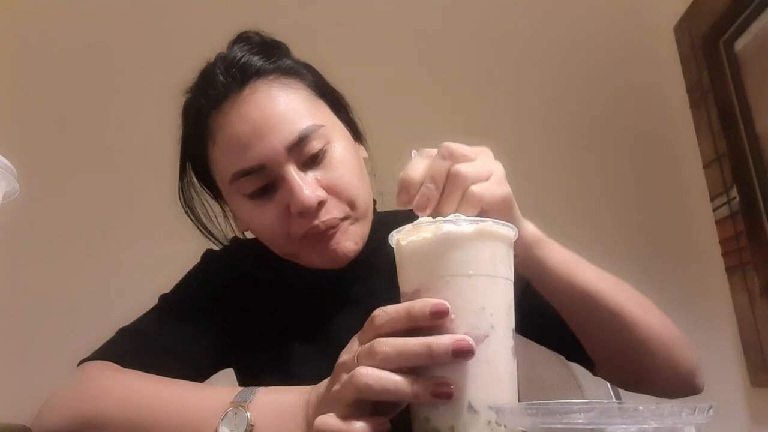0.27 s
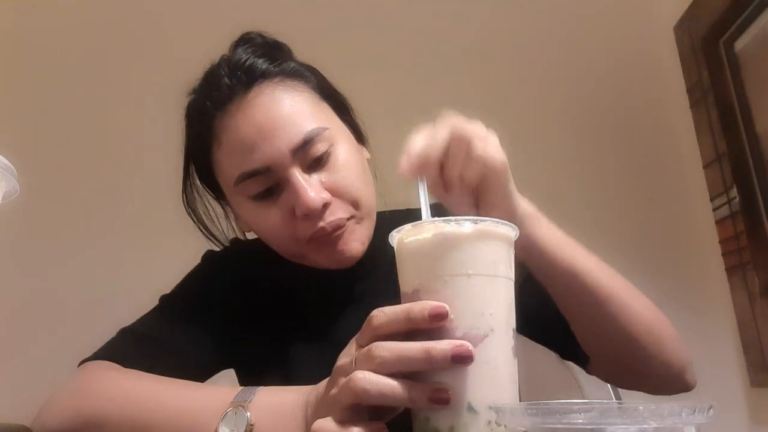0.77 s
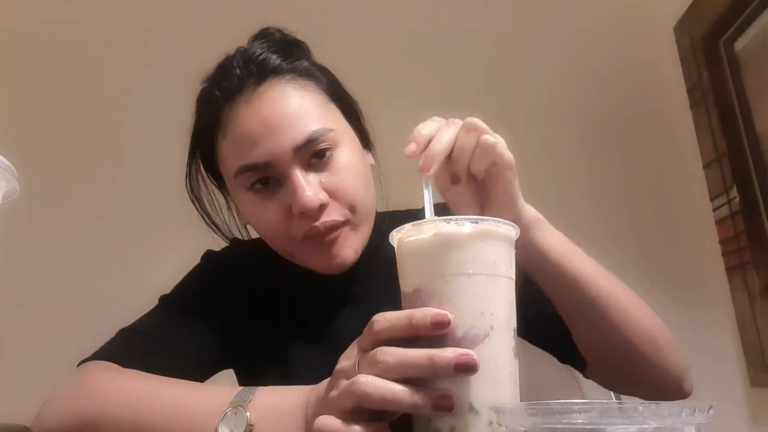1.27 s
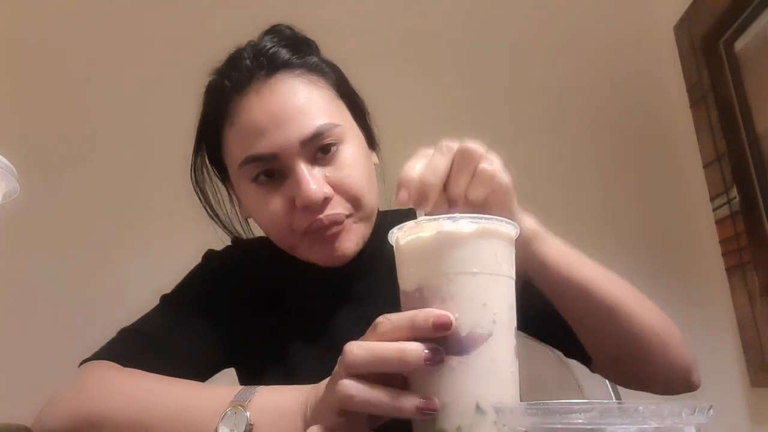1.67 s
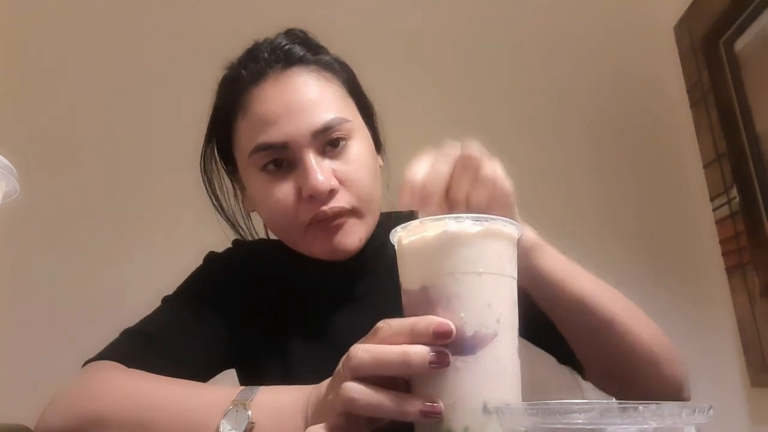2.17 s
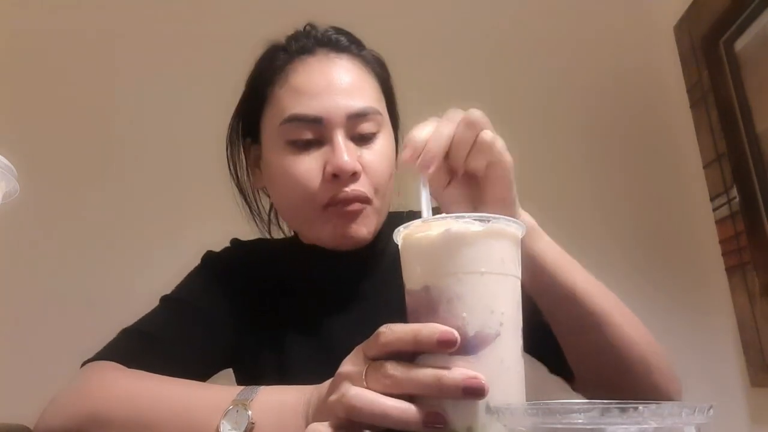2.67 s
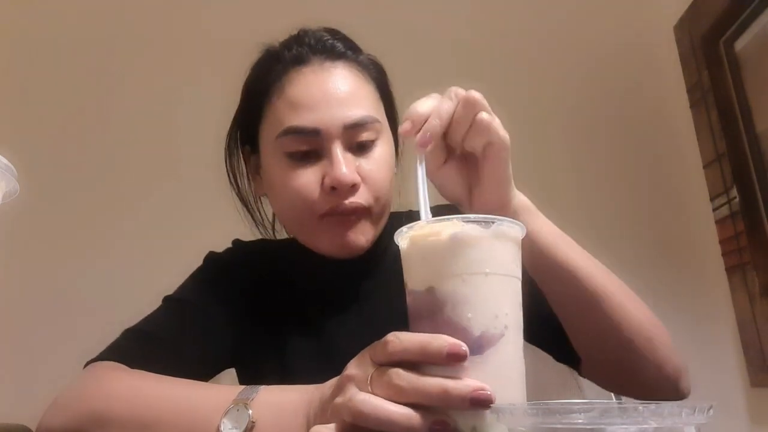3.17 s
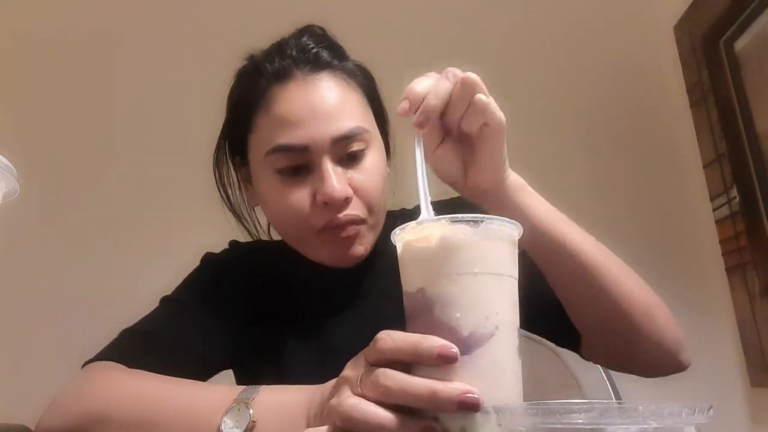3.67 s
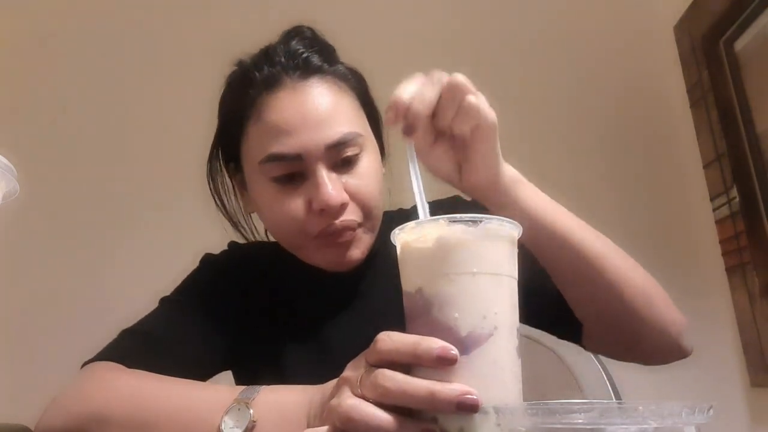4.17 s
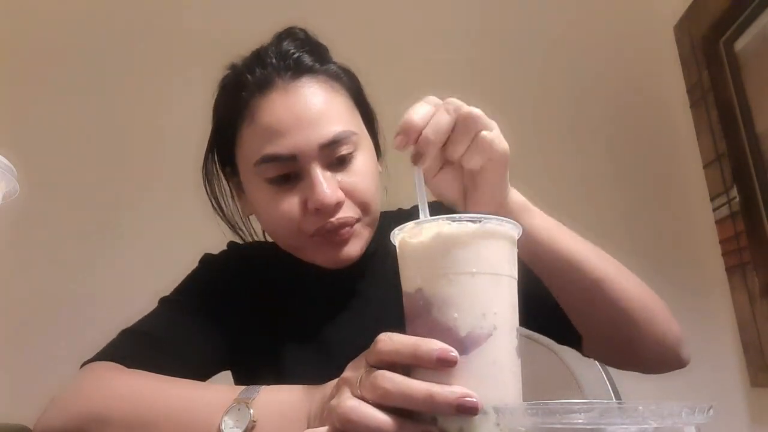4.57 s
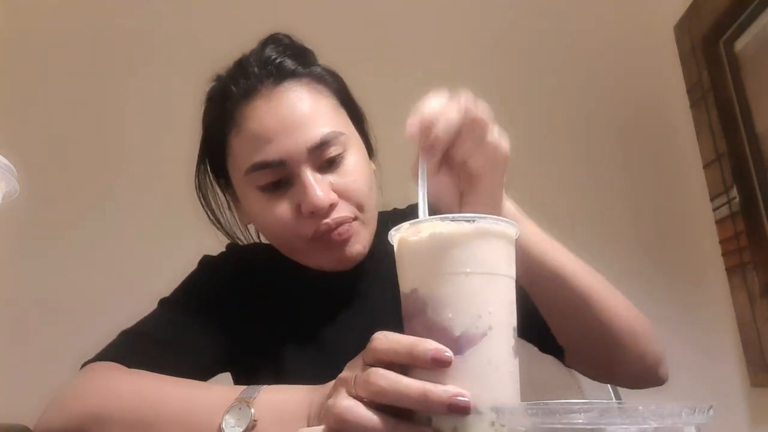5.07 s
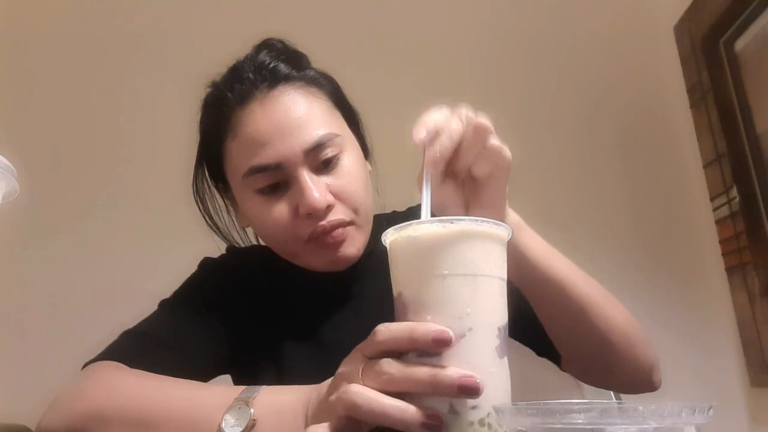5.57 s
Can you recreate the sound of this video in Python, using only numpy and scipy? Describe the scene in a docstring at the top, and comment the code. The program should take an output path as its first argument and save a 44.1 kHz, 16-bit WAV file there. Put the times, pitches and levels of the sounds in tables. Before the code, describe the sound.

A plastic spoon jabs and stirs crushed ice in a plastic cup, close to the microphone. Quick, uneven strokes bring wet crunches, sharp little clicks and dull thumps through a wooden table. The thumps are strongest around the middle, with a few low gulps, then the stirring turns lighter, with small squeaks. A faint low hum sits behind it in a quiet room.

```python
"""Spoon in crushed ice

A plastic cup of crushed ice on a wooden table in a quiet room, a phone's two microphones close by.
A plastic spoon jabs up and down: each jab thumps the table through the cup, the slush crunches and
squeaks, lumps click on spoon and wall, and deep plunges gulp. A faint tone wavers near 300 Hz."""
import sys
import numpy as np
from scipy import signal
from scipy.fft import rfft, irfft, next_fast_len
from scipy.io import wavfile
from scipy.ndimage import map_coordinates

SR = 44100
rng = np.random.default_rng(int(sys.argv[2]) if len(sys.argv) > 2 else 0)


def unload_wav(signal):
    """Save mono or channel-first audio to the path in sys.argv[1] as 16-bit WAV at rate SR, clipped to [-1, 1]."""
    wavfile.write(
        sys.argv[1],
        SR,
        np.round(np.clip(np.atleast_2d(signal).T, -1, 1) * 32767).astype(np.int16),
    )


N = 256662


def amp(db):
    """Gain of a level in dB."""
    return 10 ** (np.asarray(db) / 20)


def unit(x):
    """Scaled to rms 1."""
    return x / np.sqrt(np.mean(x ** 2) + 1e-20)


def along(points, hz):
    """Reads (frequency, value) points on a log frequency axis."""
    f, v = np.transpose(points)
    return np.interp(np.log(hz + 1), np.log(f + 1), v)


def wobble(rate):
    """A smooth random curve, rate knots a second."""
    return map_coordinates(rng.standard_normal(int(N * rate / SR) + 4), [np.arange(N) * rate / SR])


def filtered(x, response):
    """x through a complex frequency response."""
    m = next_fast_len(N + SR // 2)
    return irfft(rfft(x, m) * response(np.fft.rfftfreq(m, 1 / SR)), m)[..., :N]


def resonance(f, hz, width):
    """Response of one causal resonance."""
    return 1j * f * width / (hz * hz - f * f + 1j * f * width + 1e-9)


# Balance at the microphones: (frequency [Hz], left over right [dB])
MIC_BALANCE = [(60, -4), (400, 2), (700, 4), (1300, 8), (2400, 15), (4400, 14), (6000, 6.5), (8000, -3.5),
               (15000, 2)]
def mic_gains(hz):
    """Left and right gain: the low treble is much louder on the left."""
    return amp(along(MIC_BALANCE, hz) / 2 * np.array([[1], [-1]]))


# Likeness of the two microphones' signals: (frequency [Hz], coherence [0-1])
MIC_COHERENCE = [(60, 0.5), (300, 0.87), (640, 0.71), (1400, 0.069), (3100, 0.3), (8000, 0)]
def mic_pair(noise, colour):
    """Colours two noises and mixes them as the two microphones hear them, rms 1."""
    m = next_fast_len(N + SR // 2)
    f = np.fft.rfftfreq(m, 1 / SR)
    angle = np.arccos(np.clip(along(MIC_COHERENCE, f), 0, 1)) / 2
    mid, side = rfft(noise, m) * colour(f) * [np.cos(angle), np.sin(angle)]
    return unit(irfft(mic_gains(f) * [mid + side, mid - side], m)[:, :N])


# The quiet room at the microphones: (frequency [Hz], relative density [dB])
AIR_SPECTRUM = [(18, -9), (30, 9.5), (184, 13.5), (245, 12.5), (295, 19.5), (540, 3), (1070, -17),
                (1540, -13.5), (1760, -18), (3770, -20), (9460, -17.5), (14800, -19), (16000, -25)]
def room_air():
    """Room tone and a weak mains hum."""
    hum = amp(-62.5) * np.sin(2 * np.pi * 50 * np.arange(N) / SR)
    level = amp(-58 + 1.9 * wobble(3.42))
    return hum + level * mic_pair(rng.standard_normal((2, N)), lambda f: amp(along(AIR_SPECTRUM, f)))


# Course of the faint tone: (time [s], pitch [Hz], level [dB])
TONE_PATH = [(0, 210, -45), (.05, 215, -45.5), (.075, 299.3, -48), (.3, 303.3, -61.5), (.8, 296.5, -64),
             (3.4, 297.8, -59.5), (4.7, 296.3, -56), (5.02, 298, -54.5), (5.38, 300.5, -61),
             (5.47, 262.4, -47.5), (5.51, 260.4, -43), (5.57, 309.8, -35.5), (5.65, 297.7, -41),
             (5.72, 290, -56), (5.82, 296, -58.5)]
def faint_tone():
    """A background tone that wavers in pitch and flutters in level."""
    times, *columns = np.transpose(TONE_PATH)
    hz, db = (np.interp(np.arange(N) / SR, times, column) for column in columns)
    phase = 2 * np.pi * np.cumsum(hz) / SR + 0.85 * wobble(45)
    flutter_db = 2.5 * wobble(30)
    return amp(db + flutter_db) * np.sin(phase + np.array([[0], [.8]]))


def grit(rate, spread_db, smooth):
    """Two streams of hiss, roughened by rate tiny breaks a second of uneven size."""
    breaks = (rng.random(N) < rate / SR) * amp(spread_db * np.clip(rng.standard_normal(N), -2, 2))
    bursts = signal.fftconvolve(breaks, np.exp(-np.arange(300) / 40))[:N]
    return rng.standard_normal((2, N)) * (smooth + unit(bursts))


def splinters(count):
    """Wet splinters of ice: short damped rings, each at its own pitch and side, rms 1."""
    jitter, pitch, size, side = rng.standard_normal((count, 4)).T
    start = np.clip((np.arange(count) + jitter) * N / count, 0, N).astype(int)
    hz = np.clip(3500 * np.exp(.55 * pitch), 1200, SR / 6)[:, None]
    t = np.arange(160) / SR
    rings = amp(3.5 * np.clip(size, -2, 2))[:, None] * np.sin(2 * np.pi * hz * t) * np.exp(-hz * t / 3.5)
    at = (start[:, None] + np.arange(len(t))).ravel()
    lean_db = along(MIC_BALANCE, hz) / 2 + 3 * side[:, None]
    return unit(np.array([np.bincount(at, (amp(k * lean_db) * rings).ravel(), N)[:N] for k in (1, -1)]))


# Crunching slush from close by: (frequency [Hz], relative density [dB])
SLUSH_SPECTRUM = [(650, -24), (1100, -13), (1460, -2), (2240, -20.5), (2510, -7.5), (3510, -7), (4740, -13),
                  (7620, -12), (9000, -18.5), (11700, -82)]
def slush_colour(f):
    """The broad crunch, with the spoon's stem ringing along."""
    return amp(along(SLUSH_SPECTRUM, f)) + amp(-5) * resonance(f, hz=3975, width=50)


# Modes of the cup wall: (frequency [Hz], width [Hz], level [dB])
CUP_MODES = [(629, 246, 0.5), (908, 187, 0), (1151, 69, -6), (1464, 19, -12)]
def cup_wall(f):
    """The hollow cup's response: resonances of alternating sign."""
    return sum((-1) ** k * amp(db) * resonance(f, hz, width)
               for k, (hz, width, db) in enumerate(CUP_MODES))


# High fizz of the ice: (frequency [Hz], gain [dB])
FIZZ_SPECTRUM = [(2940, -31), (5000, 3.5), (7240, 6.5), (7420, 1.5), (10300, -6), (13900, -2), (16000, -11)]
def fizz_colour(f):
    """The bright top of crunches and cracks."""
    return amp(along(FIZZ_SPECTRUM, f))


# Strokes of the spoon: (time of hardest moment [s], rise [s], fall [s], slush level [dB],
# drag level [dB], rattle over slush [dB], fizz over slush [dB], air pocket [Hz])
SPOON_STROKES = [(0.047, 0.069, 0.14, -67, -79, -5, 1.5, 3420),
                 (0.198, 0.039, 0.094, -58.5, -73, -12, -2, 2800),
                 (0.247, 0.04, 0.073, -51.5, -68, -10, -9, 1460),
                 (.417, 0.062, 0.15, -59.5, -94, -3.5, -6, 1220),
                 (0.528, 0.018, 0.068, -47, -63.5, -32, -6.5, 2010),
                 (0.582, 0.06, 0.11, -45, -66.5, 1.5, -6, 1370),
                 (.73, 0.074, 0.098, -57.5, -100, -7.5, -6, 3836),
                 (0.885, 0.05, 0.13, -40, -58.5, 2.5, -1.5, 1230),
                 (1.152, 0.027, 0.29, -50, -59, 2, -2, 1130), (1.375, 0.008, 0.11, -58, -68, 2, -10, 3920),
                 (1.406, 0.026, 0.11, -42.5, -52.5, 2, -0.5, 3920),
                 (1.53, 0.1, 0.11, -64.5, -72, 6, -1, 3600), (1.632, 0.0057, 0.083, -55, -50, 2, -9, 3960),
                 (1.673, 0.038, 0.069, -41.5, -56.5, 5.5, -1, 4320),
                 (1.79, 0.2, 0.09, -61, -102, 1, -1.5, 3520),
                 (1.922, 0.063, 0.076, -43, -60.5, 7.5, 2, 3450),
                 (2.042, 0.14, 0.075, -61.5, -90, -4, -5, 3420),
                 (2.141, 0.041, 0.22, -48, -53, -0.5, -1.5, 2680),
                 (2.331, 0.0061, 0.34, -49.5, -52, -3, -3.5, 3230),
                 (2.601, 0.078, 0.024, -48.5, -55.5, -12, -6, 3000),
                 (2.699, 0.17, 0.051, -58, -69, -4, -2, 3170),
                 (2.805, 0.055, 0.2, -47.5, -59, -4, -1.5, 4150),
                 (3.04, 0.056, 0.063, -52.5, -60, 10, -5, 1300), (3.12, 0.053, 0.41, -71, -89, -7, 5, 1590),
                 (3.278, 0.049, 0.16, -53, -60.5, 1.5, -3, 1440),
                 (3.518, 0.031, 0.076, -54, -76, -22, -4, 2600),
                 (3.566, 0.068, 0.18, -58.5, -65, 2.5, -5.5, 1374),
                 (3.752, 0.0042, 0.11, -56.5, -69, -7, 3, 2850),
                 (3.826, 0.079, 0.077, -48, -60.5, -13, -5, 1670),
                 (3.9, 0.025, 0.2, -64, -83.5, 1.5, -12, 1670),
                 (4.08, 0.099, 0.048, -51.5, -69, -1, -6.5, 1250),
                 (4.21, 0.12, 0.084, -65.5, -78, -1.5, 4, 1430),
                 (4.323, 0.066, 0.11, -55, -68, 0, -1, 1370),
                 (4.451, 0.057, 0.063, -59.5, -81.5, -3, 1, 1490),
                 (4.558, 0.03, 0.25, -50.5, -68, -6, -3, 2070),
                 (4.832, 0.041, 0.092, -47.5, -56.5, -2, -5.5, 2300),
                 (4.96, 0.21, 0.35, -75, -75, -8, 2.5, 2530), (5.104, 0.053, 0.15, -55, -62, 6, -5.5, 2570),
                 (5.227, 0.017, 0.26, -63.5, -81, 1, -7.5, 4000),
                 (5.349, 0.016, 0.11, -52.5, -66, 0.5, -6.5, 2300),
                 (5.578, 0.017, 0.13, -48, -66, -4, -1.5, 2920),
                 (5.781, 0.087, 0.18, -77.5, -71, -5, 1, 2940)]
def swells(db, lead=1, lingers=1, weight=1):
    """Summed gain of the strokes; lead stretches each rise and lingers each fall."""
    swing_db, rise_bend, fall_bend = 25, 1.33, 0.91  # a bend over 1 holds near the top
    hardest, rise, fall = np.abs(np.transpose(SPOON_STROKES)[:3, :, None])
    grid = np.arange(0, N, 32)
    late = grid / SR - hardest
    rising = np.abs(late / (lead * rise)) ** rise_bend
    falling = np.abs(late / (lingers * fall)) ** fall_bend
    gains = weight * amp(db[:, None] - swing_db * np.where(late < 0, rising, falling))
    return np.interp(np.arange(N), grid, gains.sum(axis=0))


def stirred_slush():
    """Each stroke crunches the slush, sounds an air pocket and rattles the cup wall."""
    slush_db, _, rattle_db, fizz_db, pocket_hz = np.transpose(SPOON_STROKES)[3:]
    crunch = grit(rate=660, spread_db=4.5, smooth=0.67)
    slush = mic_pair(crunch, slush_colour) + 0.45 * splinters(count=4000)
    slush *= swells(slush_db) + amp(-90)  # the slush never quite rests
    # the air pocket around the spoon has another size in each stroke
    pockets = np.zeros((2, N))
    for hz in np.geomspace(1400, 4400, num=7):
        nearness = np.exp(-(np.log(pocket_hz / hz) / .14) ** 2)[:, None]
        band = mic_pair(crunch, lambda f: resonance(f, hz, width=.14 * hz))
        pockets += swells(slush_db, weight=nearness) * band
    rattle = mic_pair(grit(rate=190, spread_db=-4, smooth=0.73), cup_wall)
    rattle *= swells(slush_db + rattle_db, lead=0.94, lingers=0.98)
    fizz = mic_pair(grit(rate=1500, spread_db=1.5, smooth=1.2), fizz_colour)
    fizz *= swells(slush_db + fizz_db, lead=0.66, lingers=0.98)
    return slush + 0.64 * pockets + rattle + fizz


# Modes of the wooden table at the microphones: (frequency [Hz], t60 [s], swell [ms],
# first motion [+1 up, -1 down], left level [dB], right level [dB], right phase [rad])
TABLE_MODES = [(59, 0.061, 1.1, -1, 1, -4.5, 0.3), (82.9, 0.19, 2.3, -1, -15, -13, 0),
               (116, 0.23, 2.4, -1, -7, -11, -0.1), (132.5, 0.27, 4.3, -1, -8.5, -10.5, 0.08),
               (156, 0.16, 13, -1, -5, -14, -0.5), (189.2, 0.11, 0.27, 1, -1.2, -1, 0.51),
               (252, 0.093, 0.62, -1, -9, -6, -1.5), (294.55, 0.3, 0.71, 1, -13, -11.5, 1.04),
               (315.8, 0.14, 0.61, -1, -11, -6, 0), (337.6, 0.039, 3.25, 1, -1.4, -19, -2),
               (375, 0.13, 0.45, 1, -27.5, -12.5, 4), (436.6, 0.06, 4.1, -1, -4.5, -16, -1.8),
               (518, 0.021, 1.4, 1, -12.5, -16, 1.5), (637, 0.015, 0.67, 1, -9, -16.5, 0.22)]
def wooden_table(force):
    """Each mode swells at its own pace under a force and meets each microphone at another place."""
    t = np.arange(SR // 2) / SR
    ring = np.zeros((2, len(t)))
    for hz, t60, swell_ms, motion, left_db, right_db, right_phase in TABLE_MODES:
        decay = amp(np.array([[left_db], [right_db]]) - 60 * t / t60)
        swell = 1 - np.exp(-1000 * t / swell_ms)
        ring += motion * decay * swell * np.sin(2 * np.pi * hz * t + np.array([[0], [right_phase]]))
    return signal.fftconvolve(force, ring, axes=1)[:, :N]


def table_shake():
    """The spoon's drag and the cup's shudder shake the table with an uneven, noisy force."""
    drag_db = np.transpose(SPOON_STROKES)[4]
    force = swells(drag_db, lead=1.2, lingers=0.9) + cup_shudder()
    return wooden_table(rng.standard_normal((1, N)) * force * amp(3.86 * wobble(33)))


# Jabs that reach the table: (time [s], level [dB], knock trim [dB], push length [ms])
SPOON_JABS = [(0.027, -38, -41, 1.5), (0.199, -35, -24, 1.3), (0.578, -17, -24, 4),
              (0.849, -19.5, -26, 2.8), (0.883, -8, -17.5, 2.1), (0.952, -17, -31, 3.5),
              (1.148, -6.5, -34, 3.74), (1.367, -17.5, -41, 3.5), (1.402, -11, -16, 1.4),
              (1.591, -8, -39, 3.56), (1.666, -10.5, -21.5, 2.13), (1.683, -13, -26, 2.3),
              (1.839, -12, -38, 1.9), (1.907, -7.5, -21, 4.7), (2.1, -2, -33.5, 1.75),
              (2.15, -9.5, -28, 4.9), (2.328, 5.5, -38.5, 1.82), (2.5433, -1, -31, 1.57),
              (2.75, -14, -29, 1.35), (2.803, -22.5, -3.5, 3.5), (2.926, -43.5, -3, 1.2),
              (2.968, -13.5, -42, 1.77), (3.012, -16.5, -21, 2.8), (3.194, -16, -39, 2.8),
              (3.268, -13.5, -41, 3.2), (3.294, -21, -36, 4.1), (3.319, -29.5, -14, 2.3),
              (3.541, -22.5, -23, 3.6), (3.6, -34, -23, 3.9), (3.783, -27, -11.5, 2),
              (3.812, -29, -6.5, 1.9), (4.039, -29, -21, 0.63), (4.081, -29, -19, 1.3),
              (4.314, -23, -42, 3.1), (4.588, -16, -26, 5.8), (4.83, -19, -19.5, 2), (5.07, -34, -10, 1.1),
              (5.353, -37, -22, 0.82), (5.578, -23, -24, 0.62)]
def jabs():
    """A jab is a soft push of a few ms into the table and a harder knock on the cup."""
    push, knock, t = np.zeros((1, N)), np.zeros((2, N)), np.arange(400) / SR
    for s, db, knock_db, push_ms in SPOON_JABS:
        bump = np.sin(np.pi * np.clip(1000 * t / push_ms, 0, 1)) ** 2
        push[:, round(s * SR):][:, :len(t)] = amp(db - 5) * bump / bump.sum()
        burst = amp(db + knock_db + 16.5 - 60 * t / 0.022) * rng.standard_normal(len(t))
        knock[:, round(s * SR):][:, :len(t)] = burst * amp([[2], [-2]])
    thump = wooden_table(filtered(push, bending_waves))
    return uneven_load(thump) + filtered(knock, cup_wall)


def bending_waves(f):
    """High waves run faster through a board, so the thump arrives with a falling pitch."""
    lag = 0.3 * np.sqrt(f) - 2 * np.pi * f * 0.001
    low_cut = (1j * f / 146 / (1 + 1j * f / 146)) ** 2  # a brief push moves little deep bass
    return np.exp(-1j * lag) * low_cut


def uneven_load(x):
    """Arms and cup load the table unevenly: its pitches drift slightly."""
    at = np.arange(N) + .0006 * SR * wobble(14)
    return np.array([np.interp(at, np.arange(N), side) for side in x])


def cup_shudder(t60=0.21):
    """The cup shudders on the table: a force level that starts with each jab and dies away."""
    kicks = np.zeros(N)
    for s, db, *_ in SPOON_JABS:
        kicks[round(s * SR)] = amp(db - 53.5)
    return signal.lfilter([1], [1, -amp(-60 / (t60 * SR))], kicks)


# Wet squeaks: (time [s], length [s], first pitch [Hz], last pitch [Hz], width [Hz], level [dB])
SPOON_SQUEAKS = [(0.167, 0.05, 3150, 2720, 700, -64), (4.261, 0.038, 2900, 2300, 300, -68),
                 (5.002, 0.035, 2300, 2820, 300, -69.5), (1.151, 0.062, 900, 965, 91, -41.5),
                 (3.038, 0.13, 7100, 6580, 2400, -56.5), (3.489, 0.052, 3080, 2270, 450, -54.5),
                 (3.543, 0.064, 3600, 3990, 293, -62), (3.735, 0.072, 3230, 2580, 450, -58),
                 (3.982, 0.13, 2670, 4660, 600, -63.5), (4.58, 0.09, 2350, 2035, 380, -55.5),
                 (4.678, 0.049, 2150, 2950, 450, -62)]
def squeaks():
    """The spoon slides past ice in short slips: a band of noise around a gliding pitch."""
    out = np.zeros((2, N))
    for s, length, first_hz, last_hz, width_hz, db in SPOON_SQUEAKS:
        progress = np.linspace(0, 1, round(length * SR))
        noise = rng.standard_normal((2, SR // 5))
        rough = signal.lfilter(*signal.butter(2, width_hz / 2, fs=SR), noise)[:, -len(progress):]
        phase = 2 * np.pi * np.cumsum(first_hz + (last_hz - first_hz) * progress) / SR
        slips = amp(3 * map_coordinates(rng.standard_normal(40), [150 * length * progress]))
        band = unit(slips * (rough[0] * np.cos(phase) + rough[1] * np.sin(phase)))
        envelope = amp(db) * np.sin(np.pi * progress ** 0.62)
        out[:, round(s * SR):][:, :len(band)] += mic_gains(first_hz) * envelope * band
    return out


# Lumps hitting spoon and wall: (time [s], level [dB], pitch [Hz], crack over level [dB])
ICE_CLICKS = [(0.2142, -40, 2160, -28), (0.256, -37.5, 1440, -30), (0.3688, -51.5, 1370, -9),
              (0.496, -38, 2630, -30), (0.5245, -30.5, 2010, 0), (0.574, -29, 1220, -37),
              (0.5904, -35.5, 1340, -24), (0.602, -37, 2070, -24), (0.841, -40, 1540, -28),
              (0.8861, -26, 1290, -29), (1.15, -31.5, 1072, -16), (1.1568, -28.5, 4050, -26),
              (1.1555, -23.5, 880, -40), (1.2308, -37.5, 3800, -21), (1.389, -51, 3870, -14),
              (1.4004, -28, 880, -29), (1.41, -30, 2830, -14), (1.4218, -24, 3900, -18),
              (1.4236, -20, 830, -39), (1.6288, -34.5, 3870, -11), (1.661, -29, 820, -30),
              (1.663, -29.5, 4050, -20), (1.667, -33, 906, -35), (1.908, -24, 3570, -7),
              (1.912, -26.5, 740, -40), (1.926, -25.5, 3420, -6.5), (2.1307, -45, 1640, -19),
              (2.1544, -31, 3660, -27), (2.259, -41, 3520, -21), (2.329, -38.5, 1530, -17),
              (2.4755, -37, 2620, -12), (2.487, -34, 3600, -6), (2.546, -36.5, 3700, -20),
              (2.571, -37, 2030, -22), (2.6886, -59.5, 3445, 20), (2.7783, -41, 1180, -11),
              (2.804, -16.5, 3870, -35), (2.815, -23, 5430, -19), (3.04, -42, 1540, -17),
              (3.277, -46, 1370, -26), (3.494, -42.5, 2930, -15.5), (3.512, -47, 2690, -22),
              (3.5421, -37.5, 1980, -11.5), (3.593, -46, 3970, -6), (3.694, -49, 2430, -25),
              (3.7404, -30.5, 3220, -13), (3.7644, -32.5, 2740, -7), (3.752, -52, 2090, -3),
              (3.779, -34.5, 2100, -20), (3.8163, -22.5, 3580, -17), (3.926, -49, 3220, -20),
              (4.0176, -44.5, 2850, -5), (4.072, -39, 1500, -37), (4.082, -40, 4100, -10.5),
              (4.1695, -51, 6600, -4), (4.1904, -47.5, 1430, -13), (4.2808, -46, 2220, 3),
              (4.357, -39, 6330, -18), (4.4216, -41.5, 3340, 1.5), (4.522, -47, 2960, -25),
              (4.5287, -35.5, 3220, -6.5), (4.5486, -37, 3480, -9), (4.557, -26, 2850, -9.5),
              (4.5633, -23, 2297, -42), (4.585, -33, 1500, -35), (4.608, -36.5, 1400, -35),
              (4.793, -45, 3270, -55), (4.825, -26, 2690, -21), (5.0429, -49.5, 3270, 0),
              (5.073, -43.5, 2830, -32), (5.14, -44, 7040, -10), (5.3438, -46, 2370, -22),
              (5.5653, -24.5, 3160, -39)]
def ice_clicks():
    """Each lump rings briefly at its own pitch, with a burst of noise and a short bright crack."""
    lumps, cracks = np.zeros((2, 2, N + SR))
    t = np.arange(SR // 10) / SR
    body_band = signal.butter(1, [900, 5000], "band", fs=SR)
    scatter_band = signal.butter(1, [1200, 7000], "band", fs=SR)
    for s, db, hz, crack_db in ICE_CLICKS:
        noise = rng.standard_normal((3, 2, len(t)))
        mic_offset = np.array([[0], [rng.uniform(0, 0.0003)]])
        t60 = 18 / hz + 0.0018
        ring = amp(1 - 60 * t / t60) * np.sin(2 * np.pi * hz * (t + mic_offset))
        body = signal.lfilter(*body_band, noise[0]) * amp(-7 - 60 * t / 0.014)
        scatter = signal.lfilter(*scatter_band, noise[1]) * amp(-48 - 60 * t / 0.022)
        onset = amp(db) * (1 - np.exp(-t / 0.0001))
        lumps[:, round(s * SR):][:, :len(t)] += onset * mic_gains(hz) * (ring + body + scatter)
        cracks[:, round(s * SR):][:, :len(t)] += onset * noise[2] * amp(crack_db - 60 * t / 0.014)
    return lumps[:, :N] + filtered(cracks[:, :N], fizz_colour)


# Deep plunges of the spoon: (time [s], level [dB])
PLUNGES = [(1.595, -36.5), (1.841, -39), (2.102, -25), (2.33, -20.5), (2.545, -25), (2.753, -31.5),
           (2.97, -37), (3.196, -42)]
def gulps():
    """A pocket in the slush gulps: an uneven ring of sinking pitch, mostly on the left microphone."""
    from_hz, to_hz, sink_s, swell_s, t60 = 560, 148.2, .075, 0.016, 0.34
    out, t = np.zeros(N + SR), np.arange(SR // 5) / SR
    hz = to_hz + (from_hz - to_hz) * np.exp(-t / sink_s)
    ring = amp(-60 * t / t60) * (1 - np.exp(-t / swell_s)) * np.sin(2 * np.pi * np.cumsum(hz) / SR)
    for s, db in PLUNGES:
        out[round(s * SR):][:len(t)] += amp(db) * ring
    return out[:N] * amp(4 * wobble(90) + np.array([[0], [-11]]))


# Decay of the small room: (frequency [Hz], t60 [s])
ROOM_DECAY = [(200, 0.048), (2000, 0.13), (10000, 0.0089)]
def room_reverb(x):
    """Each frequency of the room's answer dies at its own speed."""
    hz, t, spectra = signal.stft(rng.standard_normal((2, SR // 2)), SR, nperseg=256)
    tail = signal.istft(spectra * amp(-60 * t / along(ROOM_DECAY, hz)[:, None]), SR, nperseg=256)[1]
    return signal.fftconvolve(x, tail / np.linalg.norm(tail[0]), axes=1)[:, :N]


def scene():
    """Spoon, ice, cup and table up close, with a little of the room on the ice."""
    shake = table_shake()
    ice = stirred_slush() + ice_clicks() + squeaks()
    return jabs() + gulps() + shake + ice + amp(-13) * room_reverb(ice) + faint_tone() + room_air()


def record(dry):
    """The phone's microphones fall off in the deep bass and keep nothing above the band limit."""
    low_hz, top_hz = 40, 15950
    return filtered(dry, lambda f: (f < top_hz) * (1j * f / low_hz / (1 + 1j * f / low_hz)) ** 3)


dry = scene()
out = record(dry)
unload_wav(out)
```